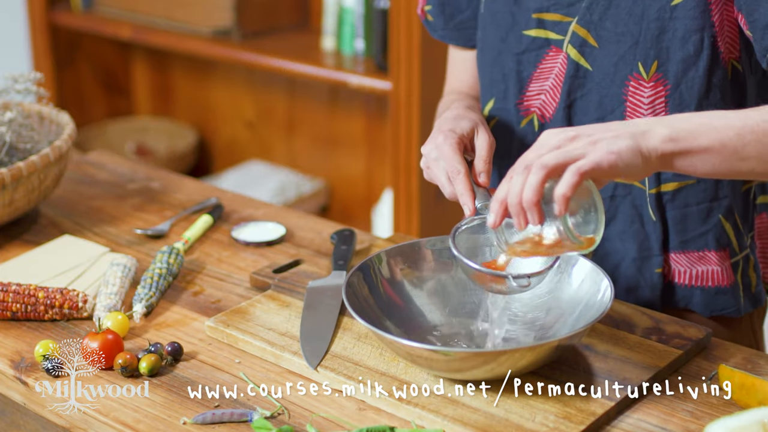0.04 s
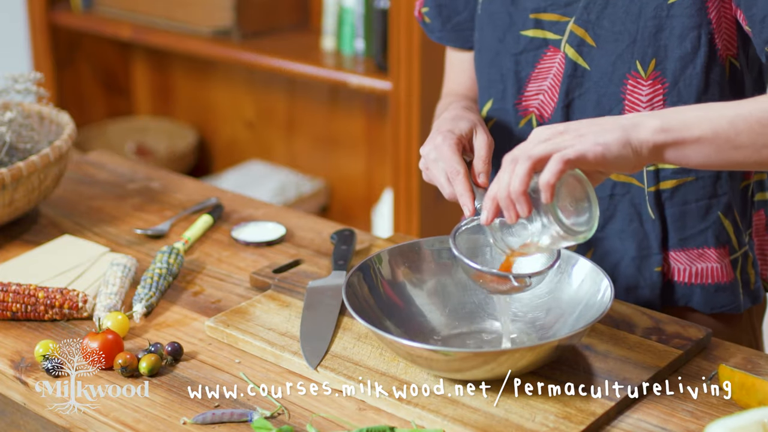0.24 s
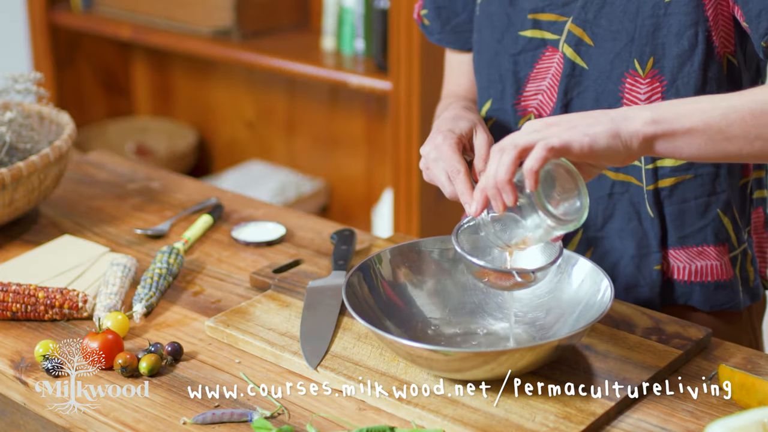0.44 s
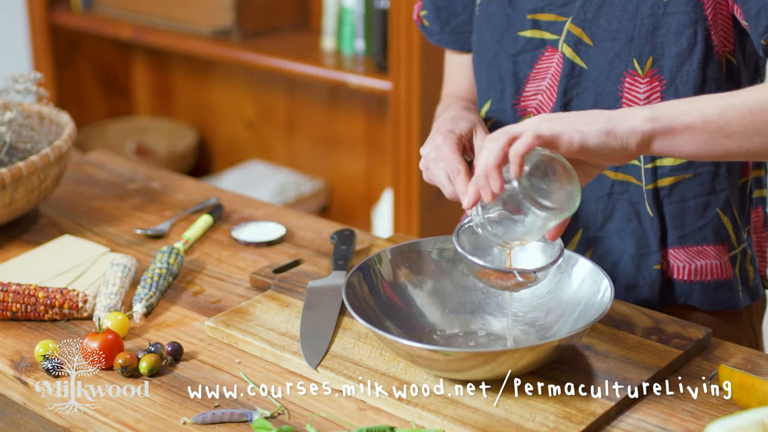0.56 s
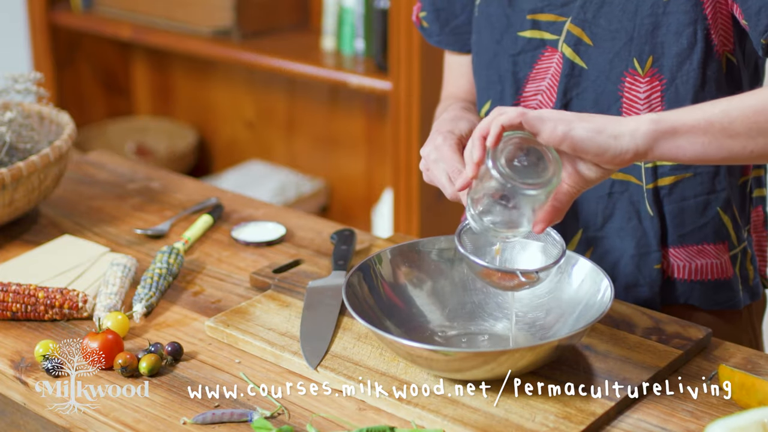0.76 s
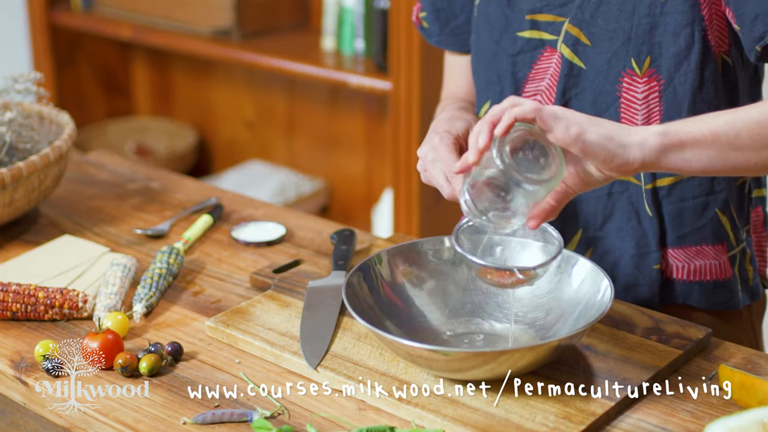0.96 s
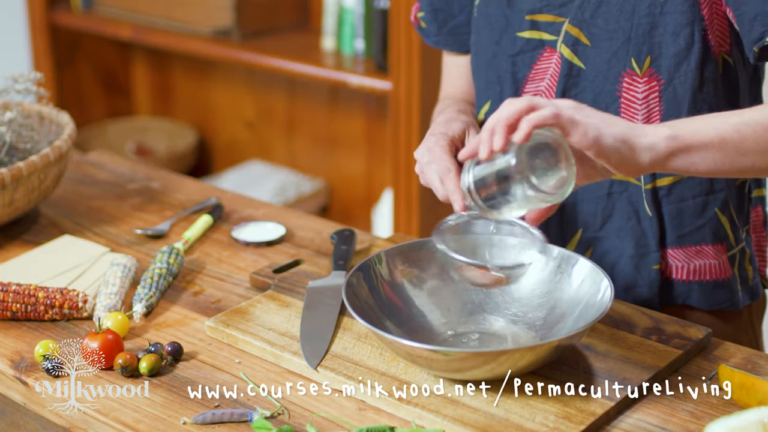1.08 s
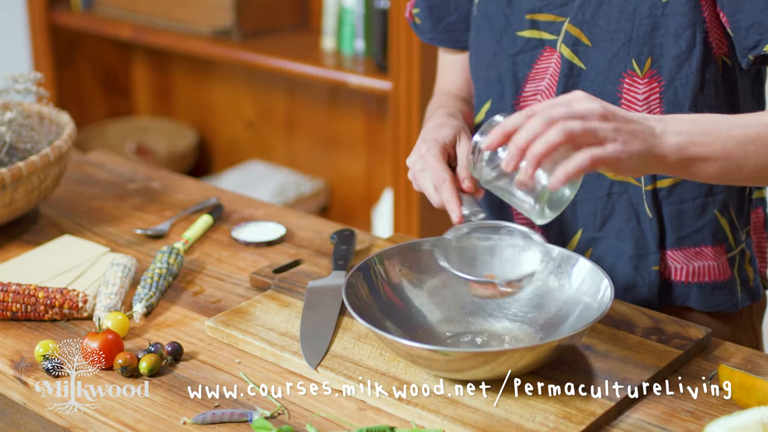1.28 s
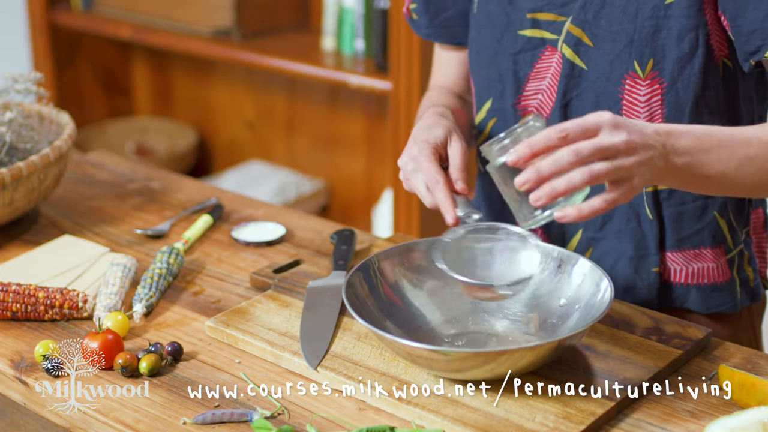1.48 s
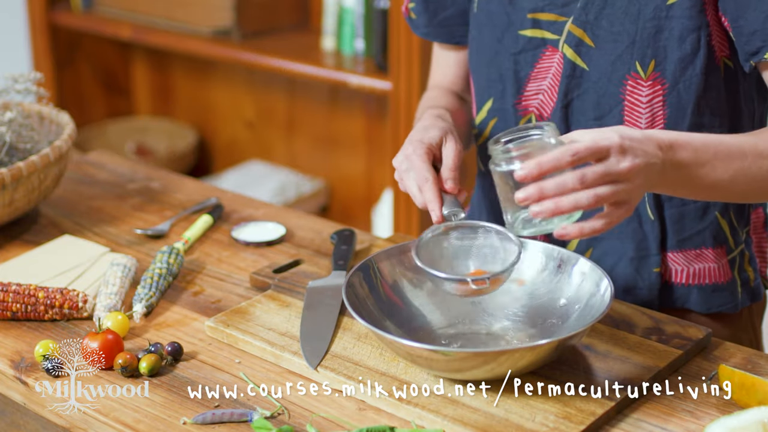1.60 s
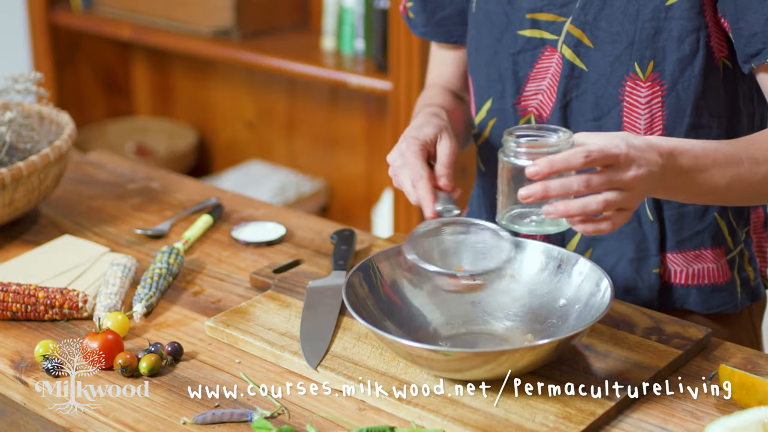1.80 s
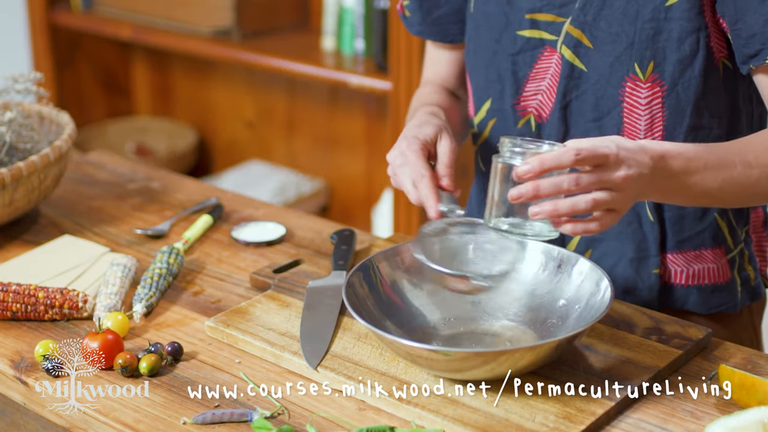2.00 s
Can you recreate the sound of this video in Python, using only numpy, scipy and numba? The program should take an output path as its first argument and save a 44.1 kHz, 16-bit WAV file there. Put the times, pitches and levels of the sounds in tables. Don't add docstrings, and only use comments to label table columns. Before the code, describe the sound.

Watery liquid trickles through a sieve into a metal bowl, thinning to a few last drips

```python
import sys
import numpy as np
from scipy import signal
from scipy.fft import rfft, irfft
from scipy.io import wavfile
from scipy.ndimage import uniform_filter1d
from numba import njit

SR = 44100
rng = np.random.default_rng(int(sys.argv[2]) if len(sys.argv) > 2 else 0)


def volts(x):
    e = np.asarray(x, float) / 20
    return 10 ** e


def output_pcm(signal):
    pcm = np.clip(np.atleast_2d(signal).T, -1, 1) * 32767
    wavfile.write(sys.argv[1], SR, np.round(pcm).astype(np.int16))


N = 90052

# (time [s], peak level [dB], pitch [Hz], life [cycles])
DROPS = [(.1060, -23.5, 7170, 11), (.1135, -22, 6100, 13.6), (.1270, -31, 6870, 21),
         (.1960, -40.5, 6830, 21), (.0548, -29, 2940, 13.6), (.070, -41, 2980, 12), (.0915, -29, 1398, 9.7),
         (.125, -44.5, 1158, 9.2), (.0925, -34.5, 1937, 25.5), (.1231, -35, 2570, 10),
         (.2094, -38, 2040, 3.1), (.2200, -35, 1916, 5.2), (.3394, -45, 1990, 5.7), (.5645, -31, 2780, 9.3),
         (.5660, -33.5, 3420, 11), (.5791, -27, 2380, 5.8), (.5800, -32.5, 3350, 16),
         (.5805, -38, 1725, 10.5), (.6114, -49, 2465, 26), (.7477, -36.5, 3340, 8), (.748, -43, 1800, 6.3),
         (1.0880, -60.5, 1900, 8.4), (1.350, -67.5, 1710, 6.4),
         (.0044, -37, 5380, 27), (.0214, -40, 5400, 20), (0.036, -27.5, 4960, 8.9),
         (0.0378, -24, 6960, 7.7), (0.0438, -25.5, 6140, 16), (0.0519, -30, 6530, 42),
         (0.091, -16, 5250, 4.9), (0.0923, -18.5, 6860, 17), (0.0987, -22, 7120, 11),
         (0.1001, -22, 6330, 27), (.1100, -23, 6740, 14), (0.2296, -30, 6730, 19), (0.231, -34, 4530, 9.8),
         (0.3777, -28.5, 4370, 6.9), (0.399, -47.5, 4350, 11), (0.412, -36.5, 4100, 13),
         (0.414, -33, 6100, 11.4), (0.4988, -50, 6260, 12), (.5410, -41.5, 3500, 8.7),
         (0.542, -27.5, 4500, 11.7), (.5701, -25, 4850, 14), (.5715, -22.5, 5360, 8.6),
         (0.5755, -25, 4520, 8.2), (.6380, -36, 4200, 8.1), (0.6398, -25, 5490, 8.7),
         (0.7466, -25, 4700, 10.3), (0.75, -22.5, 5700, 6.7),
         (0.0368, -31, 9080, 12), (0.0908, -28.5, 9010, 19), (0.091, -31.5, 11050, 22),
         (0.127, -40, 10200, 13), (.1330, -33, 11000, 5.2), (0.178, -47, 9820, 21), (0.184, -38, 10600, 13),
         (0.1845, -34.5, 13300, 10), (.2570, -39, 12630, 5), (0.4131, -26.5, 9890, 8.9),
         (0.499, -40.5, 12050, 16), (.5385, -42.5, 9700, 16), (.5700, -38.5, 11000, 9.2),
         (1.0615, -41, 12630, 2.4), (1.0880, -61, 4240, 11), (1.1930, -53.5, 12900, 3.2),
         (1.2100, -58.5, 10700, 18), (1.2161, -61.5, 4480, 21), (1.349, -62, 4180, 8.4),
         (1.485, -51.5, 4200, 11), (1.6243, -45, 6200, 11)]
# (time [s], peak level [dB], pitch [Hz], life [cycles])
PATTER = [(.0400, -32, 6300, 10), (.0470, -39, 10200, 16), (.0505, -31, 7400, 16), (.0770, -41, 3120, 28),
          (.0745, -47.5, 4220, 12), (.0945, -40, 9000, 13), (.1030, -27, 6700, 8.8), (.1140, -27, 7100, 11),
          (.1330, -31.5, 5040, 8), (.1425, -37.5, 2270, 11), (.1440, -39.5, 5440, 20),
          (.1650, -42.5, 1680, 8.5), (.1770, -44, 10800, 11), (.2340, -37, 6800, 30),
          (.2440, -38, 7000, 45), (.3330, -50, 4000, 12), (.3820, -44, 4140, 15), (.4160, -38.5, 10400, 16),
          (.4190, -45, 9340, 18), (.4235, -38, 10100, 27), (.4340, -42, 9900, 25),
          (.5510, -44.5, 4440, 8.6), (.5850, -35.5, 5000, 9), (.5920, -41.5, 5300, 9),
          (.6080, -43.5, 4630, 15), (.6430, -37.5, 5920, 8.9), (.6530, -41.5, 5450, 20),
          (.7390, -40, 4660, 14), (.7400, -45.5, 3320, 9), (.7535, -35, 5200, 9.8),
          (0.7484, -23.5, 4850, 5.8), (.7570, -39.5, 4900, 11), (.7710, -41.5, 5220, 20),
          (.7830, -44, 5280, 22), (0.4133, -39.5, 4650, 11), (0.57, -36, 2830, 13),
          (0.0926, -27, 4230, 5.3), (.0400, -38.5, 4340, 12)]
# (time [s], peak level [dB], pitch [Hz], life [cycles])
GULPS = [
    (.045, -53, 758, 13),
    (.07, -58.5, 710, 13),
    (.093, -44, 805, 6.6),
    (.13, -53, 707, 23),
    (.19, -57, 654, 17),
    (0.574, -50, 1123, 15.6),
    (.748, -47, 930, 3.3),
]
# (time [s], peak
# level [dB], pitch [Hz], life [cycles])
SURFACE_POPS = [(0.021, -37.5, 11500, 20), (0.2097, -33.5, 12400, 18), (.2735, -41, 10500, 32),
                (.3130, -32.5, 3920, 8.7), (0.3175, -35, 4100, 15), (0.3197, -34.5, 9570, 16),
                (0.32, -39, 11800, 12), (.3259, -31.5, 2077, 6), (.3333, -37, 12400, 20),
                (.3335, -36, 10500, 14), (0.5705, -25, 5300, 2), (0.5804, -18, 3500, 1.9),
                (1.622, -23.5, 4140, 9.7), (1.6265, -44, 4320, 14), (1.626, -44, 3370, 8.2),
                (1.635, -46, 3470, 11), (1.641, -46, 4460, 12), (1.6545, -46, 3720, 8.2),
                (1.658, -49, 4500, 9), (1.666, -47, 2700, 2.8), (1.8355, -46, 765, 2.2),
                (0.0353, -37.5, 11700, 14), (0.7457, -40.5, 13100, 10)]
# (time [s], peak level [dB], centre [Hz],
# decay [s], half width [octaves])
SPRAY_CRACKS = [(0.036, -38.5, 6400, 0.027, 0.77), (0.091, -30, 4700, 0.0069, 1),
                (.184, -46, 9000, 0.0031, .85), (0.21, -40, 5500, 0.0038, .85),
                (.229, -37, 5460, 0.0068, 0.55), (0.412, -41.5, 9000, 0.014, 0.41),
                (.498, -47, 5800, 0.0042, 1), (.541, -41, 3870, 0.0054, 0.54),
                (.565, -37.5, 3000, 0.01, 0.68), (.579, -38.5, 4000, 0.0034, 0.93),
                (.638, -47, 5000, 0.0047, 0.71), (0.7469, -35, 3850, 0.0033, .85),
                (1.0618, -52, 9000, 0.00048, .85), (1.085, -63, 3500, 0.009, 0.75),
                (1.349, -64, 4500, 0.0053, .7), (1.486, -57.5, 4800, 0.006, .6),
                (1.623, -47.5, 4560, 0.013, 0.43), (1.8345, -49, 1500, 0.002, 0.77)]
# (time [s], level [dB])
STREAM_LEVEL = [(0, -70), (.04, -53.5), (.1, -51.5), (.2, -55), (.3, -71.5), (.42, -60.5), (.5, -81),
                (.58, -58.5), (.7, -79), (.8, -68), (1.0, -83)]
# (time [s], level [dB])
GATE_LEVEL = [(0, -49.5), (.2, -47.5), (.5, -53.5), (.6, -47), (.7, -51), (.9, -54.5), (1.0, -53.5),
              (1.045, -61), (1.07, -57), (1.16, -67), (1.21, -60), (1.26, -70), (1.38, -68), (1.435, -75.5),
              (1.47, -58), (1.65, -50.5), (1.85, -53.5), (2.04, -60)]
# (frequency [Hz], density [dB per Hz])
ROOM_TONE = [(30, -18), (50, -1), (115, -2.5), (200, -14), (540, -24), (1430, -27.5), (3670, -29),
             (16000, -35.5)]


def unit(x):
    return x / np.sqrt(np.mean(x ** 2))


def curve(points):
    p = np.array(points)
    return np.interp(np.arange(N) / SR, p[:, 0], p[:, 1])


@njit
def add_bubbles(out, times, sizes, pitches, cycles, rise, swell):
    for k in range(len(times)):
        life = cycles[k] / pitches[k]
        start = int(times[k] * SR) + 1
        stop = min(start + int(3 * life * SR), len(out))
        for i in range(start, stop):
            u = (i / SR - times[k]) / life
            shape = (u / swell * np.exp(1 - u / swell)) ** 3
            turns = cycles[k] * u * (1 - rise / 2 + rise * u / 2)
            out[i] += sizes[k] * shape * np.sin(2 * np.pi * turns)


def bubbles(rows, swell=0.47):
    out = np.zeros(N)
    times, db, hz, cycles = np.array(rows, float).T.copy()
    pitches = np.minimum(hz, 0.4 * SR)
    add_bubbles(out, times, volts(db), pitches, np.maximum(cycles, 1.0), 0.04, swell)
    return out


def splashes(rows):
    level_db, decay_s, top_hz = -27.5, 0.0013, 11000
    table = np.array(rows)
    hits = np.zeros(N)
    np.add.at(hits, (table[:, 0] * SR).astype(int), volts(table[:, 1] + level_db))
    envelope = signal.lfilter([1], [1, -np.exp(-1 / (decay_s * SR))], hits)
    bright_noise = np.diff(rng.standard_normal(N + 1))
    return signal.lfilter(*signal.butter(2, top_hz, fs=SR), envelope * bright_noise)


def stream_fizz():
    per_s, span_s = 900, 1.1
    centre_hz, spread_octaves, cycles, scatter_db = 4000, 0.81, 5.9, 2.5
    when, pitch_a, size, pitch_b = rng.random((int(per_s * span_s), 4)).T
    octaves = spread_octaves * 2 * (pitch_a + pitch_b - 1)
    hz = np.clip(centre_hz * 2 ** octaves, 900, 15000)
    db = -scatter_db * np.log(size + 0.03)
    rows = np.c_[when * span_s, db, hz, np.full(len(when), cycles)]
    return unit(bubbles(rows)) * volts(curve(STREAM_LEVEL))


def spray_cracks():
    out = np.zeros(N)
    t = np.arange(2048) / SR
    for s, db, hz, decay_s, octaves in SPRAY_CRACKS:
        edges = [hz / 2 ** octaves, min(hz * 2 ** octaves, 0.45 * SR)]
        band = signal.butter(2, edges, "band", fs=SR)
        noise = signal.lfilter(*band, rng.standard_normal(len(t)))
        start = int(s * SR)
        out[start:start + len(t)] += volts(db) * unit(noise) * np.exp(-t / decay_s)
    return out


def table_knock():
    return bubbles([(1.8345, -40.5, 493, 2.3)], swell=0.46)


def bowl_and_room(x):
    bowl_db, bowl_t60_s, echoes_per_s, bowl_gap_s = -2, 0.038, 6000, 0.0012
    room_db, room_t60_s, room_dull_hz = -10, 0.18, 9000
    t = np.arange(SR // 3) / SR
    chance = np.clip((echoes_per_s / SR - rng.random(len(t))) * SR / 200, 0, 1)
    echoes = rng.standard_normal(len(t)) * chance * (t > bowl_gap_s)
    echoes = echoes * volts(-60 * t / bowl_t60_s)
    tail = rng.standard_normal(len(t)) * volts(-60 * t / room_t60_s)
    tail = tail * np.minimum(t / 0.015, 1)
    tail = signal.lfilter(*signal.butter(1, room_dull_hz, fs=SR), tail)
    response = volts(bowl_db) * echoes / np.sqrt(np.sum(echoes ** 2))
    response = response + volts(room_db) * tail / np.sqrt(np.sum(tail ** 2))
    return x + signal.fftconvolve(x, response)[:N]


def lifted_hiss(water):
    level_db, release_s = -28.5, 0.045
    keep = np.exp(-1 / (release_s * SR))
    opening = np.sqrt(signal.lfilter([1 - keep], [1, -keep], water ** 2))
    return volts(level_db) * opening * np.diff(rng.standard_normal(N + 1))


def walk(rate):
    k = int(SR / rate)
    steps = np.repeat(rng.standard_normal(N // k + 1), k)
    return 0.82 * uniform_filter1d(uniform_filter1d(steps, k), k)[:N]


def room_tone():
    hum_hz, hum_db = 115, -12.5
    f = np.maximum(np.fft.rfftfreq(N, 1 / SR), 1)
    p = np.array(ROOM_TONE)
    colour = volts(np.interp(np.log(f), np.log(p[:, 0]), p[:, 1]))
    colour = colour / (1 + (38 / f) ** 8)
    noise = rfft(rng.standard_normal(N)) * colour
    low = 1 / (1 + (f / 300) ** 2)
    rumble = irfft(noise * low, N)
    hiss = irfft(noise * (1 - low), N)
    scale = np.sqrt(np.mean(rumble ** 2))
    hum = volts(hum_db + 3.9 * walk(8.8)) * np.sin(2 * np.pi * hum_hz * np.arange(N) / SR)
    rumble = rumble / scale * volts(1.3 * walk(9.7))
    hiss = hiss / scale * volts(0.67 * walk(22.53))
    return (rumble + hum + hiss) * volts(curve(GATE_LEVEL))


def scene():
    drops = DROPS
    tone, knock, pops = room_tone(), table_knock(), bubbles(SURFACE_POPS)
    pool = bubbles(drops + GULPS + PATTER) + splashes(drops + SURFACE_POPS)
    pool = pool + stream_fizz() + spray_cracks()
    wet = volts(-8.5)
    water = bowl_and_room(pool + wet * pops + 0.42 * knock) + (1 - wet) * pops
    return (water + lifted_hiss(water) + 0.63 * knock + tone)[None]


def band_limit(x):
    return signal.sosfilt(signal.butter(12, 16480, fs=SR, output="sos"), x)


def record(dry):
    low_pass = signal.ellip(8, 0.3, 40, 15750, fs=SR, output="sos")
    mix = signal.sosfilt(low_pass, dry)
    return band_limit(mix)


dry = scene()
out = record(dry)
output_pcm(out)
```